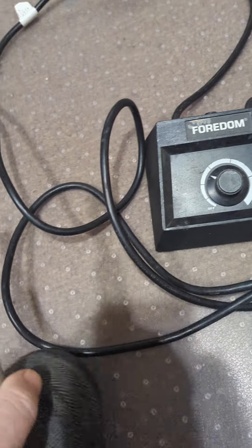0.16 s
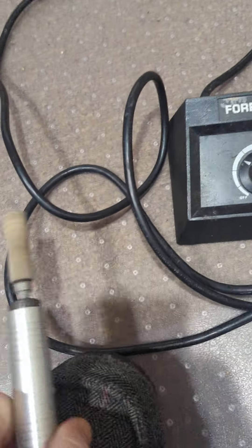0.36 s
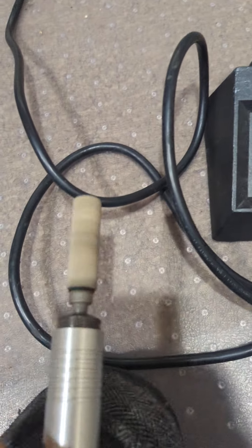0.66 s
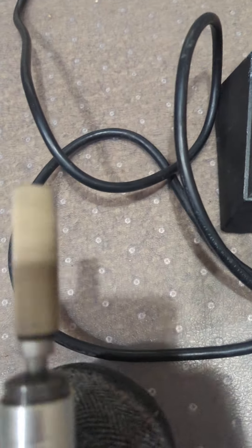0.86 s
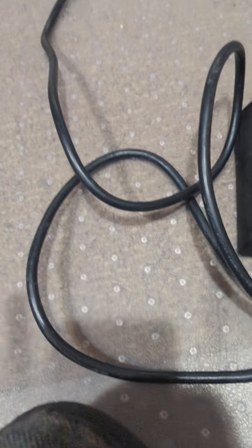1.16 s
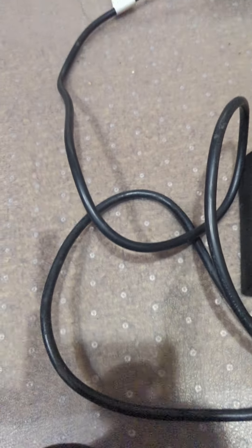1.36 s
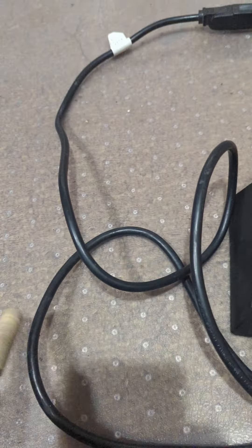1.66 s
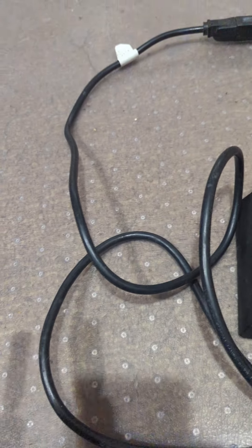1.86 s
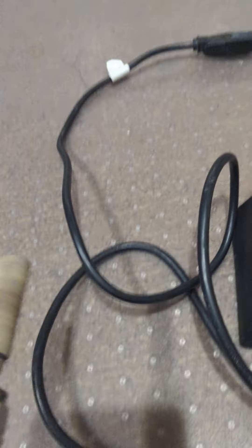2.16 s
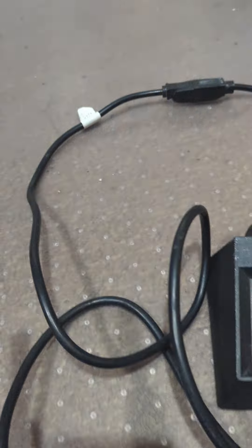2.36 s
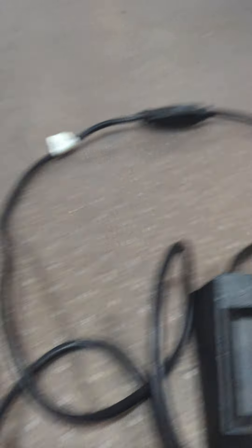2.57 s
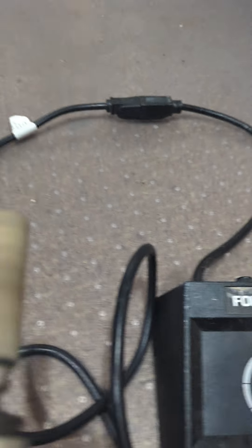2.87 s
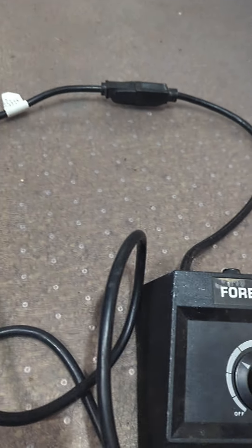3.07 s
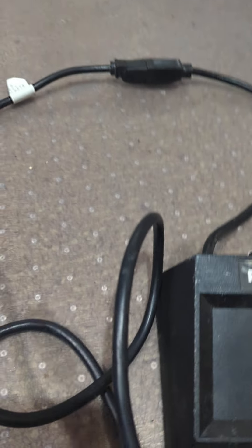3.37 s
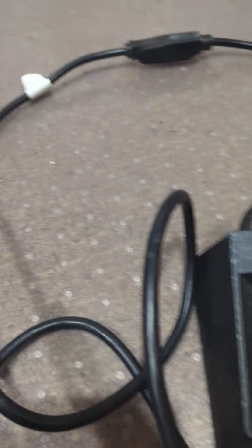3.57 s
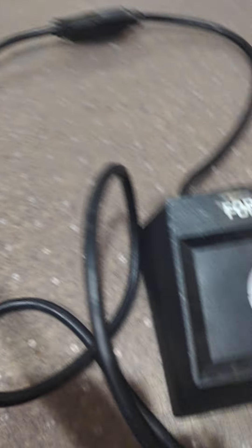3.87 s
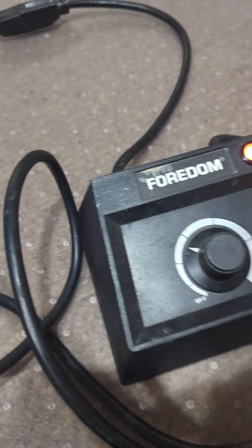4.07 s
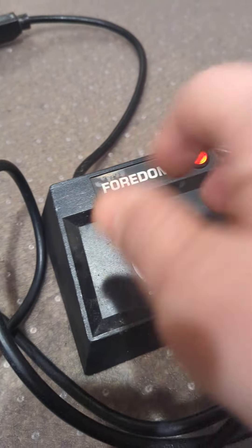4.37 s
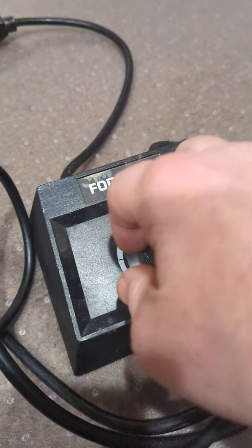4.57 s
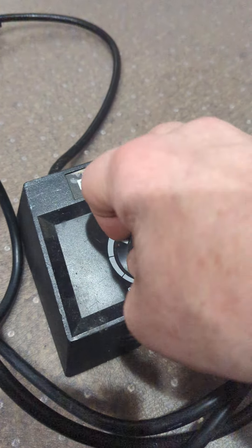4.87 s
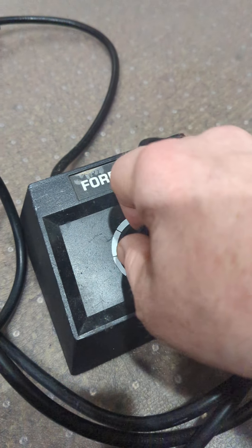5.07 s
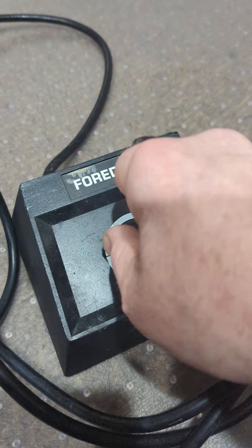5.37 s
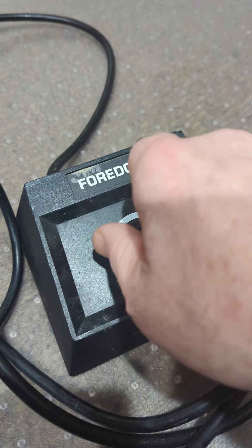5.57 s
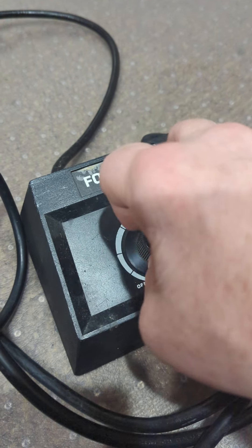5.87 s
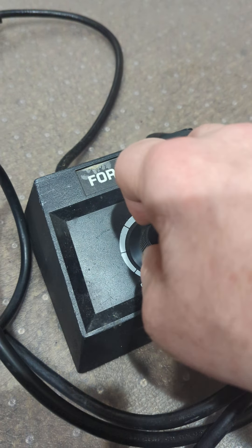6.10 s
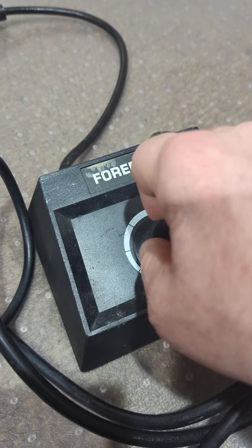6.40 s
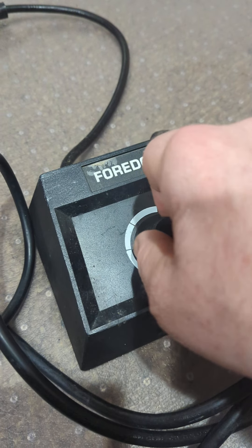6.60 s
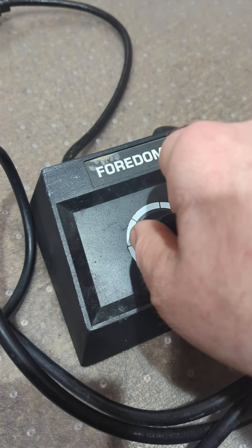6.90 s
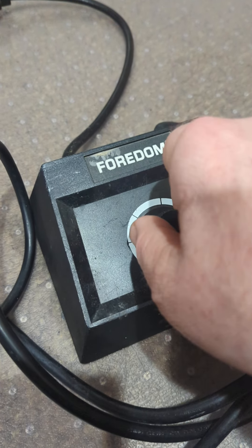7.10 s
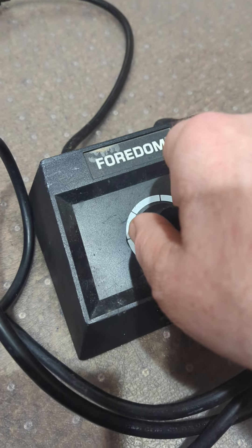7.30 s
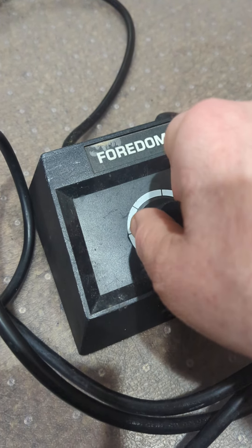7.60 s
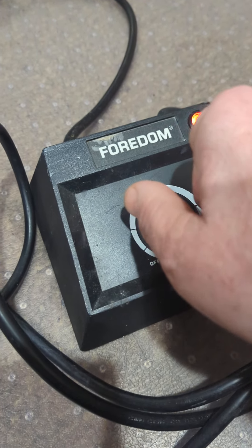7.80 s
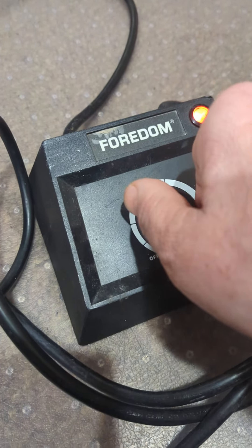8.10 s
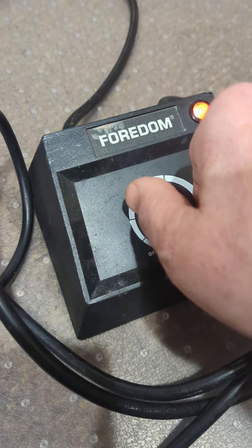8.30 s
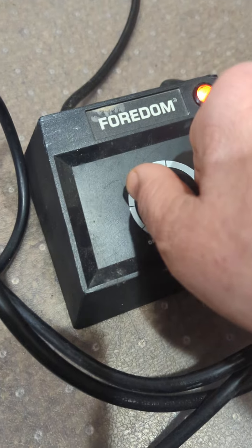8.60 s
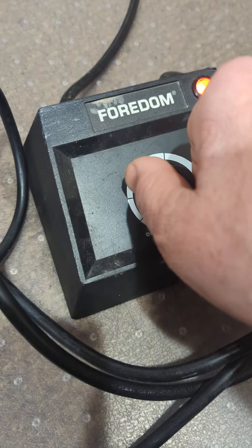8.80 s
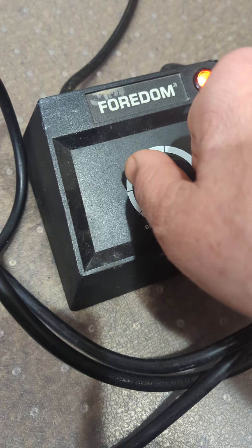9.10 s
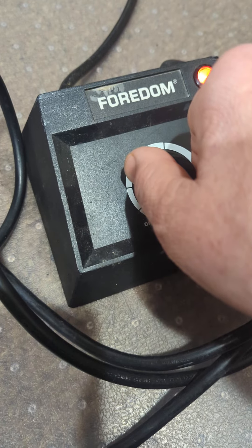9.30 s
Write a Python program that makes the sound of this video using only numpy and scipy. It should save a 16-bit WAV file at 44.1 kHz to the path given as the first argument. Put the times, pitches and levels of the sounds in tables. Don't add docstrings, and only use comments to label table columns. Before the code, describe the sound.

Stereo close handheld microphone, quiet room with faint air and hum. A low buzzing motor gradually slows, with soft cable drags, carpet thumps, one sharper knock and small hollow slaps. Once-a-turn ticks blur into a rattling purr, growing nearer on the right. Then the speed rises fast, ticks merging into rasp and whine, wavering at first, then levelling high and bright until the end.

```python
import sys
import numpy as np
from scipy import signal
from scipy.fft import rfft, irfft, next_fast_len
from scipy.io import wavfile
from scipy.ndimage import uniform_filter1d, map_coordinates

SR = 44100
rng = np.random.default_rng(int(sys.argv[2]) if len(sys.argv) > 2 else 0)


def linear_from_db(decibels):
    return 10 ** (np.asarray(decibels, float) / 20)


def dump(signal):
    limited = np.clip(np.atleast_2d(signal).T, -1, 1)
    pcm = np.round(limited * 32767).astype(np.int16)
    wavfile.write(sys.argv[1], SR, pcm)


N = 416744
TIME = np.arange(N) / SR
TURNED = np.clip((TIME - 4.5) / 0.24, 0, 1)


def unit(x):
    return x / np.sqrt(np.mean(x ** 2) + 1e-20)


def curves(rows):
    s, *cols = np.transpose(rows)
    return [np.interp(TIME, s, c) for c in cols]


def along(points, at):
    x, *cols = np.transpose(points)
    return [np.interp(np.log(at), np.log(x), v) for v in cols]


def wobble(rate):
    knots = rng.standard_normal(int(N * rate / SR) + 4)
    return map_coordinates(knots, [np.arange(N) * rate / SR])


def sine(order, turns, phase):
    return np.sin(2 * np.pi * order * turns + phase)


def filtered(x, response):
    m = next_fast_len(N + 8192)
    return irfft(rfft(x, m) * response(np.fft.rfftfreq(m, 1 / SR)), m)[..., :N]


def modes(f, rows):
    total = 0
    for k, (c, w, db) in enumerate(rows):
        total = total + (-1) ** k * linear_from_db(db) * 1j * f * w / (c * c - f * f + 1j * f * w)
    return total


def rung_twice(x, hz, width):
    return filtered(x, lambda f: modes(f, [(hz, width, 0)]) ** 2)


def housing(x, rows, fast):
    slow_ring = unit(filtered(x, lambda f: modes(f, [(c, w, db) for c, w, db, _ in rows])))
    fast_ring = unit(filtered(x, lambda f: modes(f, [(c, w, db) for c, w, _, db in rows])))
    return (1 - fast) * slow_ring + fast * fast_ring


def pulses(turns, jitter, scatter_db):
    k = np.arange(1, int(turns[-1]))
    chance = rng.standard_normal((len(k), 2))
    at = np.interp(k + jitter * chance[:, 0], turns, np.arange(N)).clip(0, N - 2)
    size, i = linear_from_db(scatter_db * chance[:, 1]), at.astype(int)
    return np.bincount(i, size * (1 - at + i), N) + np.bincount(i + 1, size * (at - i), N)


def rasp(turns, tones, grit, beat):
    rub = rng.standard_normal(N) * linear_from_db(grit * wobble(1500) + beat * np.cos(2 * np.pi * turns))
    return unit(rub) + tones


# [t/s, speed/turns per s]
SHAFT_SPEED = [(0.0, 84.73), (0.7, 77.05), (1.5, 69.96), (2.4, 63.93), (3.3, 59.12), (4.1, 55.81),
               (4.8, 52.36), (5.03, 53.15), (5.28, 72.96), (5.45, 96.3), (5.7, 127.5), (5.88, 142.0),
               (6.1, 157.65), (6.92, 224.61), (7.2, 239.7), (7.7, 255.75), (8.2, 265.12), (8.7, 270.16),
               (9.45, 275.55)]


def drive():
    speed, = curves(SHAFT_SPEED)
    turns = np.cumsum(speed) / SR + .3
    return speed, turns, np.clip((speed - 90) / 140, 0, 1)


# [t/s, level/dB]
WHIP_SWELLS = [(1.12, 0), (5.52, 0.5), (5.63, 2), (5.73, 6), (5.85, 3.5), (5.94, 2), (6.011, 5), (6.1, 6.5),
               (6.276, 7), (6.35, 9), (6.43, 7.5), (6.51, 6), (6.57, 8), (6.63, 9.5), (6.7, 4), (6.811, 6),
               (6.87, 8), (6.92, 5), (6.981, 7), (7.039, 5), (7.1, 3.5), (7.23, 4), (7.47, 3), (7.76, 7),
               (7.92, 3.5)]


def whip():
    swell = sum(db * np.exp(-((TIME - s) / 0.011) ** 2 / 2) for s, db in WHIP_SWELLS)
    return swell - uniform_filter1d(swell, SR // 5) + 1.2 * wobble(7) + wobble(30)


# [order/cycles per turn, level/dB]
RACE_TONES = [(10.5, -6), (13.1, -5), (14, -3), (17.58, -1), (20.9, -3), (21.95, -3), (24.3, -3),
              (24.9, -5), (27.7, -1), (31.8, -3), (34.6, -2), (35.3, 2), (38.25, 1), (38.8, 0), (42.2, 1),
              (43.15, 0), (45.1, -2), (48.4, -2), (49.3, -4), (52, 1), (52.9, -5), (56.45, 3), (59.1, -3),
              (60.8, 2), (63, -2), (66, -4), (66.75, -4), (69.8, 0), (73.7, 0)]
TOOL_ORDER = 23


def bearings(turns, speed):
    def line(order, db):
        audible = order * speed < .45 * SR
        return linear_from_db(db + 5.2 * wobble(10)) * audible * sine(order, turns, 0.053 * order * wobble(20))

    low = sum(line(k, db) for k, db in RACE_TONES if k < TOOL_ORDER)
    low = low * (0.067 + .17 * np.exp(-((speed - 110) / 28) ** 2))
    high = sum(line(k, db) for k, db in RACE_TONES if k > TOOL_ORDER)
    high = high * .085 * (speed / 125) ** 1.15
    return low + .45 * high, .3 * low + high


# [t/s, level/dB]
BRUSH_HISS = [(0, -21.5), (.4, -20), (.6, -23.5), (1.3, -20), (1.6, -24.5), (3.3, -23.5), (3.6, -20),
              (4.2, -28), (5.0, -26), (5.6, -13), (5.8, -17.5), (6.2, -17), (6.7, -20.5), (7.2, -18),
              (8, -18.5), (8.6, -16), (8.8, -18), (9.45, -17.5)]
# [f/Hz, width/Hz, slow level/dB, fast level/dB]
BODY_RINGS = [(854, 120, -2, 25), (1150, 230, -1.5, -42), (1786, 116, 10, 16), (2920, 1700, -3, -10)]
# [f/Hz, width/Hz, slow level/dB, fast level/dB]
BRUSH_RINGS = [(4700, 800, -14, -20), (6400, 500, -6, -7), (7400, 350, -5, -6), (8620, 200, 0, 2),
               (9900, 1600, -10, -6), (11800, 1300, -7, -5.5), (15600, 350, -16, -11)]


def motor(turns, speed, tones, fast, swell):
    brush_db, = curves(BRUSH_HISS)
    body_db = brush_db - 11 - 8.5 * np.exp(-((speed - 150.5) / 83) ** 2)
    body_rub = rasp(turns, 1.65 * tones, 0.81, 0.39)
    brush_rub = rasp(turns, 0.58 * tones, 2.6, 0.33)
    ports = []
    for body_trim_db, brush_trim_db in [(-0.5, -5), (-0.5, -10)]:
        body = housing(body_rub + 1.3 * rng.standard_normal(N), BODY_RINGS, fast)
        brush = housing(brush_rub + 3.4 * rasp(turns, 0.4 * tones, 3.6, 0.29), BRUSH_RINGS, fast)
        body = linear_from_db(body_db + body_trim_db + 1.15 * swell) * body
        brush = linear_from_db(brush_db + brush_trim_db + .85 * swell) * brush
        ports.append(body + brush)
    return np.array(ports)


# [f/Hz, width/Hz, slow level/dB, fast level/dB]
BARREL_RINGS = [(603, 2280, -19.5, -13), (1000, 950, -10.5, -3), (1710, 400, 2, 9), (2387, 1000, -2, 4)]


def barrel(turns, tones, near_db, fast, swell):
    level_db = near_db + 1.5 * TURNED * (1 - fast) - 6.5 + .5 * swell
    return linear_from_db(level_db) * housing(rasp(turns, 0.65 * tones, 3.0, 1.0), BARREL_RINGS, fast)


# [t/s, f/Hz]
COLLET_RING = [(0, 6200), (3, 5150), (3.35, 5250), (3.6, 6570), (4.05, 6450), (4.35, 5750), (5, 5550),
               (5.6, 5670), (7, 5470), (9.45, 5590)]


def collet(turns, tones, near_db, fast, swell):
    centre, = curves(COLLET_RING)
    level_db = -13 + near_db + 10.5 + 0.5 * (centre - 5500) / 1000
    level_db = level_db - TURNED * (1 - fast) - 5.5 + 0.75 * swell
    rub = rasp(turns, 1.4 * tones, 2.5, 1.0)
    upper = 0
    for hz in [5200, 5900, 6600]:
        share = np.clip(1 - abs(centre - hz) / 700, 0, 1) ** .5
        upper = upper + share * unit(rung_twice(rub, hz, 1300))
    low_rub = rasp(turns, .3 * tones, 2, .9)
    lower = unit(filtered(low_rub, lambda f: modes(f, [(3900, 700, 0)]) ** 2 + modes(f, [(5400, 450, 1)]) ** 2))
    woken = .1 + .3 * TURNED * (1 - fast) + .6 * fast
    return linear_from_db(level_db) * (upper + woken * lower)


# [f/Hz, width/Hz, slow level/dB, fast level/dB]
SIZZLE_RINGS = [(8600, 500, 0, -2), (10000, 1300, -7, -4), (11800, 900, -3, 0), (15600, 350, -12, -7)]


def sizzle(turns, high_tones, fast, swell):
    level_db = -23.5 + 1.37 * (curves(BRUSH_HISS)[0] + 21)
    rub = rasp(turns, 1.5 * high_tones, 2.0, 0.59)
    return linear_from_db(level_db - 9.0 + 1.0 * swell) * housing(rub, SIZZLE_RINGS, fast)


# [speed/turns per s, tick over barrel level/dB]
COUPLING_PLAY = [(52, 13), (57, 16), (61, 14), (63, 11), (70, 5), (82, -2), (100, -13), (122, -8),
                 (140, 11), (236, 11), (255, 0), (276, -3)]
# [f/Hz, width/Hz, level/dB]
FACING_TICK = [(300, 200, -10), (532, 220, -7), (2330, 690, 4), (6130, 2330, -7), (11500, 5800, -19)]
# [f/Hz, width/Hz, level/dB]
AWAY_TICK = [(300, 170, -12), (560, 150, -7), (2200, 800, 2.5), (3900, 1300, -7), (5500, 2300, -1)]


def shaft_tick(turns, speed, near_db, fast):
    def rung(x, rings, sign):
        return filtered(x, lambda f: sum(sign ** (c > 4000) * linear_from_db(db) * modes(f, [(c, w, 0)]) ** 2
                                         for c, w, db in rings))

    tick_db = near_db + along(COUPLING_PLAY, speed)[0]
    cage_sway_db = 0.63 * np.cos(2 * np.pi * .143 * turns + 1)
    blows = pulses(turns, 0.002, .6) * linear_from_db(tick_db + cage_sway_db + 20.0 - 10 * fast + 0.5 * TURNED)
    ring = rung((1 - TURNED) * blows, FACING_TICK, -1) + rung(TURNED * blows, AWAY_TICK, 1)
    snaps = pulses(turns, .003, 0.98) * linear_from_db(tick_db + 8) * np.clip(.7 * TURNED + 2 * fast, 0, 1)
    return ring + filtered(snaps, lambda f: modes(f, [(5300, 3600, 0)]))


# [t/s, barrel level/dB]
TOOL_NEARNESS = [(0, -40), (.25, -34.5), (.8, -33.5), (1.0, -31), (1.4, -28), (1.6, -35), (2.2, -31),
                 (2.6, -25.5), (3.0, -19), (4.0, -15), (4.8, -15.5), (5.5, -11), (6.0, -14.5), (6.8, -14),
                 (7.25, -11), (8.5, -10.5), (8.9, -11.5), (9.45, -11)]


def handpiece(turns, speed, tones, high_tones, fast, swell):
    near_db, = curves(TOOL_NEARNESS)
    tick = shaft_tick(turns, speed, near_db, fast)
    near = barrel(turns, tones, near_db, fast, swell) + collet(turns, tones, near_db, fast, swell)
    near = near + sizzle(turns, high_tones, fast, swell) + tick
    leak = np.roll(linear_from_db(-22) * near + linear_from_db(-14) * np.diff(tick, prepend=0), 16)
    return np.array([leak, near])


# [speed/turns per s, unbalance/dB, 2nd order/dB, 3rd order/dB]
SHAFT_SHAKE = [(55, -38, -45, -28.5), (58, -37, -34, -28.5), (68, -38, -29, -33), (80, -30, -31, -31),
               (90, -41, -26, -33), (114, -32, -32, -35), (138, -20.5, -24, -32), (172, -7.5, -33.5, -22.5),
               (210, -13.5, -24.5, -29), (240, -17.5, -17.5, -20), (267.4, -20, -16.5, -19.5),
               (268.4, -26, -16.5, -18)]
# [order/cycles per turn, level re low orders/dB]
SHAFT_UPPER = [(4, -5), (5, -6), (6, -4), (7, -3), (8, -4), (9, -4), (10, -8), (11, -11), (12, -11),
               (15, -9), (16, -9)]
# [order/cycles per turn, level over barrel/dB, f/Hz, width/Hz]
BALL_WHINES = [(30.85, -6, 1808, 100), (35.3, -9, 1890, 130), (42.2, -12, 2700, 240),
               (30.85, -10, 1990, 160), (21.05, -7, 2000, 500), (35.3, -12, 2150, 200),
               (31.8, -14, 1900, 250), (26.1, -10, 1900, 350), (25, -11, 1800, 300), (24.3, -9, 1900, 350),
               (23.2, -9, 2000, 400), (21.9, -8, 2150, 500), (19.2, -11, 1800, 400), (15, -11, 1620, 250),
               (14, -6, 1720, 260), (20.95, -10, 2600, 350), (13, -12, 1850, 300), (8.83, -15, 2060, 280),
               (35.3, -7.5, 5900, 900), (42.4, -9, 5700, 1100), (45.4, -15, 5900, 1000),
               (49, -18, 5800, 1000), (31.8, -17, 5600, 900), (51.8, -19, 5800, 1000),
               (55.9, -20, 5500, 1200), (59.3, -20, 5500, 1200), (27.7, -17, 6100, 1200),
               (54.2, -23, 8800, 1600), (59.4, -24, 9800, 2000), (56.45, -27, 10200, 2000),
               (60.8, -26, 11800, 1800), (52.1, -27, 10300, 1800), (69.8, -23, 10500, 2500),
               (63, -25, 9500, 2500), (66.4, -28, 11000, 2000), (45.2, -28, 10300, 1200),
               (17.45, -7, 1920, 380)]


def whine(turns, speed, fast, swell):
    def line(order, db, blur):
        return np.sqrt(2) * linear_from_db(db) * sine(order, turns, blur * wobble(25))

    def ring(off_hz, width):
        return 1 / (1 + (2 * off_hz / width) ** 2)

    near_db, = curves(TOOL_NEARNESS)
    one, two, three = 0.88 * near_db + along(SHAFT_SHAKE, speed)
    shaft = line(1.0, one + 0.86 * swell, .05) + line(2, two + 0.9 * swell, 0.24)
    shaft = shaft + line(3, three + .5 * swell, 0.19)

    lows_db = (two + three) / 2 + .7 * swell
    runup = np.clip((speed - 55) / 15, 0, 1) * (TURNED > 0)
    upper = 0
    for k, db in SHAFT_UPPER:
        lift_db = runup * (9 * ring(k * speed - 590, 120) + 2 * (1 - fast) * (k < 10))
        upper = upper + line(k, lows_db + lift_db + db + 2 * wobble(8), 0.19 * k)
    half_orders = [(.5, -55), (1.5, -54), (2.5, -43), (7.5, -35)]
    halves = sum(line(k, db + 40 * (fast - 1), .4) for k, db in half_orders)

    cage_db = near_db - 12 + 22 * np.log2(speed / 251) - 1.5 * np.clip(speed - 272, 0, None)
    cage_orders = [(7.75, -1), (4.42, -15), (6.42, -12)]
    cage = sum(line(k, cage_db + db + 1.5 * wobble(12), .4) for k, db in cage_orders)

    balls, far = np.zeros(N), np.zeros(N)
    for k, db, hz, width in BALL_WHINES:
        tone = ring(k * speed - hz, width) * line(k, near_db + db + 2.0 * wobble(16), .7)
        balls += tone
        if hz > 8000:
            far += tone
    left_shaft_db = -31.0 + 28.5 * np.clip((2.6 - TIME) / 0.32, 0, 1)
    left = linear_from_db(left_shaft_db) * shaft + linear_from_db(-38) * cage + linear_from_db(-56) * balls + linear_from_db(-1) * far
    return np.array([left, shaft + upper + halves + cage + balls])


# [f/Hz, level/dB per Hz]
ROOM_AIR = [(20, -18), (60, -4), (150, -1), (300, 0), (700, 0), (2000, -16), (6000, 2.5), (16000, -7.5)]
# [f/Hz, level/dB]
SUPPLY_HUM = [(120, -80), (241, -59), (360, -78), (600, -68)]


def room(fast):
    f, db = np.transpose(ROOM_AIR)
    air = rng.standard_normal(N) + 0.67 * rng.standard_normal((2, N))
    air = unit(filtered(air, lambda hz: linear_from_db(np.interp(np.log(hz + 1), np.log(f), db))))
    hum = sum(np.sqrt(2) * linear_from_db(db + wobble(3.2)) * np.sin(2 * np.pi * hz * TIME) for hz, db in SUPPLY_HUM)
    return linear_from_db(-46.0) * air + hum * linear_from_db(-25 * fast)


# [t/s, length/s, level/dB, f/Hz]
CABLE_DRAGS = [
    (0, 0.13, -47, 240),
    (0, .22, -52, 80),
    (1.12, .11, -51.5, 90),
    (6.152, 0.49, -54, 55),
]


def shuffles():
    out = np.zeros(N)
    for s, length, db, hz in CABLE_DRAGS:
        hold = np.clip(np.minimum(TIME - s + 0.012, s + length - TIME) / 0.018, 0, 1)
        rumble = unit(rung_twice(rng.standard_normal(N), hz, 2.4 * hz))
        out += linear_from_db(db + 4 * wobble(25.4)) * hold * rumble
    return out * linear_from_db([[2], [-2]])


# [t/s, peak level/dB, f/Hz, t60/s, left over right level/dB]
FLOOR_KNOCKS = [(.009, -41, 176, 0.12, 3), (0.956, -32, 74.6, 0.25, 3), (1.028, -38, 80, 0.25, 4),
                (1.11, -43, 90, 0.29, 5), (1.19, -53, 85, .15, -2), (1.681, -28, 1650, .025, 4),
                (1.686, -29, 190, 0.046, 3), (1.693, -28, 520, .022, 6), (1.7, -36, 150, 0.12, 3),
                (2.819, -38, 204, 0.047, -10), (2.919, -41, 375, 0.078, 2), (3.051, -44, 1000, .05, 0),
                (3.15, -40, 350, .08, 0), (3.229, -44, 330, .08, 0), (3.327, -50, 458, 0.084, 0),
                (3.964, -37, 386, 0.12, -13), (4.1, -47, 400, .08, 0), (4.858, -69, 300, .07, -3),
                (4.939, -55, 399, .07, -7), (6.205, -41, 60, .1, -22), (6.434, -41, 270, 0.058, -21),
                (6.635, -41, 270, 0.052, -17)]


def knocks():
    out, t = np.zeros((2, N + SR)), np.arange(SR // 4) / SR
    soft = signal.butter(1, 900, fs=SR)
    for s, db, hz, t60, pan_db in FLOOR_KNOCKS:
        decay = linear_from_db(-60 * t / t60)
        puff = 1.3 * decay * signal.lfilter(*soft, rng.standard_normal(len(t)))
        thump = decay * np.sin(2 * np.pi * hz * t + 8 * (1 - np.exp(-t / 0.009)))
        sides = linear_from_db(db + np.array([[pan_db / 2], [-pan_db / 2]]))
        out[:, round(s * SR):][:, :len(t)] += sides * (thump + puff)
    return out[:, :N]


# [t/s, level/dB]
SLACK_RUSTLE = [(0, -52), (.9, -40.5), (1.6, -50), (2, -53), (2.9, -47.5), (3.3, -44.5), (4, -49)]
# [t/s, peak level/dB, f/Hz]
SINGLE_SLAPS = [(1.943, -38, 1060), (1.978, -37, 1220), (2.144, -40, 1150), (2.183, -41, 1160),
                (2.223, -35, 1036), (2.264, -36, 1030), (2.321, -42, 966), (2.357, -36, 1060),
                (2.397, -42, 1000), (2.479, -32, 1020), (2.52, -35, 1025), (2.57, -34, 1000),
                (2.747, -34, 1110), (2.825, -34, 1110), (2.879, -37, 985), (2.919, -35, 956)]


def burble(fast):
    slaps = rng.standard_normal(N) * linear_from_db(3.3 * wobble(45))
    high, low = unit(rung_twice(slaps, 1240, 230)), unit(rung_twice(slaps, 1082, 230))
    sunk = np.interp(TIME, (0.74, 1.2), [0, 1])
    rustle = np.sqrt(1 - sunk) * high + np.sqrt(sunk) * low
    out = linear_from_db(curves(SLACK_RUSTLE)[0]) * (1 - fast) * rustle
    t, rise_s = np.arange(SR // 10) / SR, 0.0042
    for s, db, hz in SINGLE_SLAPS:
        swell_and_die = np.e * t / rise_s * np.exp(-t / rise_s)
        blip = swell_and_die * np.sin(2 * np.pi * hz * t * (1 - 1.5 * t))
        out[round(s * SR):][:len(t)] += linear_from_db(db - 1) * blip
    return out


# [f/Hz, width/Hz, level/dB]
SHELL_RINGS = [(8620, 350, 0), (7400, 300, -7)]


def shell(turns, speed):
    def flare(hz):
        return sum(linear_from_db(db) / (1 + (2 * (hz - c) / w) ** 2) for c, w, db in SHELL_RINGS)

    sung = np.zeros(N)
    for k, db in RACE_TONES:
        if k > TOOL_ORDER:
            sung += flare(k * speed) * linear_from_db(db + 2 * wobble(12)) * sine(k, turns, 2.3 * wobble(25))
    return linear_from_db(curves(BRUSH_HISS)[0] - 11) * sung * linear_from_db([[0], [-8]])


def scene():
    speed, turns, fast = drive()
    swell = whip()
    tool_tones, motor_tones = bearings(turns, speed)
    machine = motor(turns, speed, motor_tones, fast, swell)
    machine = machine + handpiece(turns, speed, tool_tones, motor_tones, fast, swell)
    machine = machine + whine(turns, speed, fast, swell)
    return machine + room(fast) + shuffles() + knocks() + burble(fast) + shell(turns, speed)


def low_pass(x):
    return signal.sosfilt(signal.butter(12, 16380, fs=SR, output="sos"), x)


def record(dry):
    x = filtered(dry, lambda f: (1j * f / (60 + 1j * f)) ** 2)
    x = x / (1 + np.abs(x / 0.97) ** 8) ** (1 / 8)
    x = filtered(x, lambda f: f < 15850)
    return low_pass(x)


dry = scene()
out = record(dry)
dump(out)
```